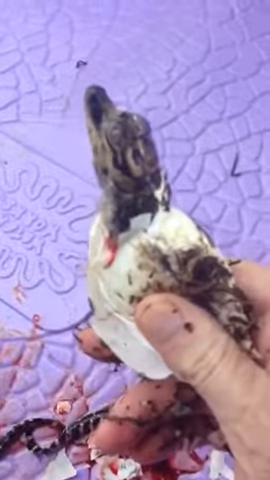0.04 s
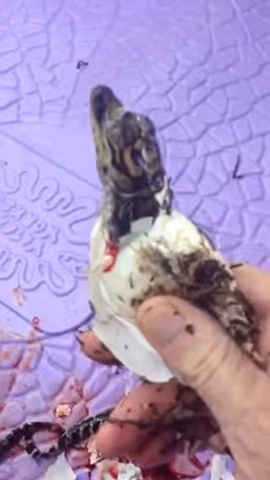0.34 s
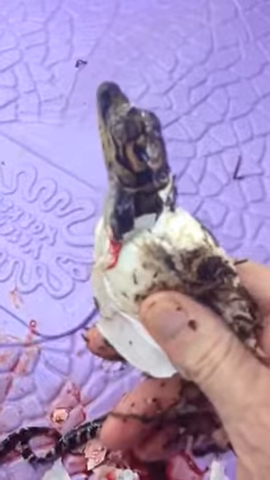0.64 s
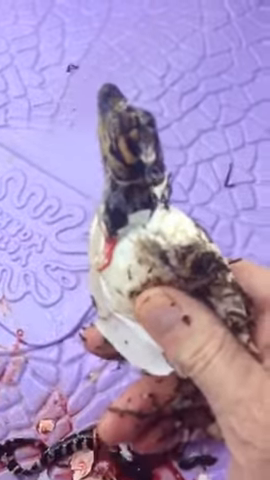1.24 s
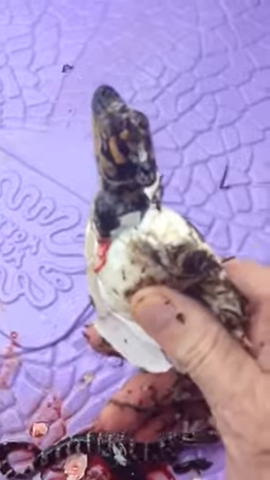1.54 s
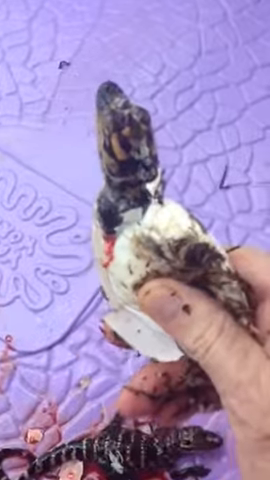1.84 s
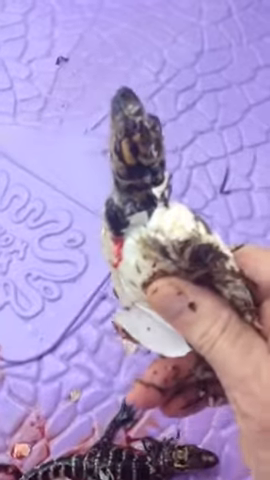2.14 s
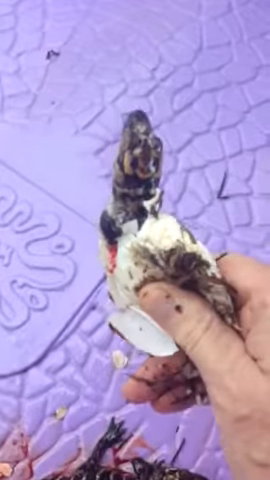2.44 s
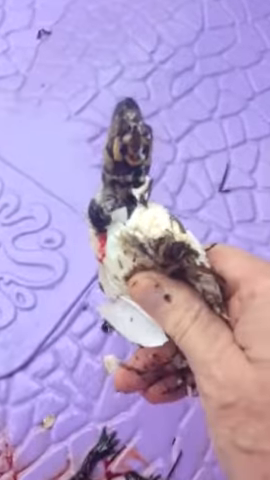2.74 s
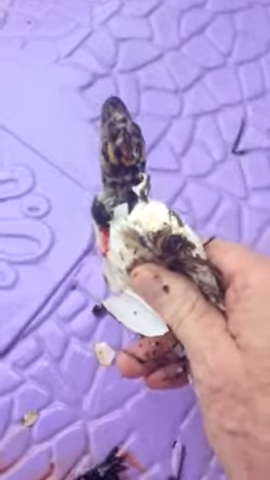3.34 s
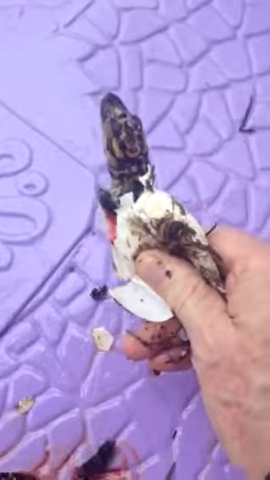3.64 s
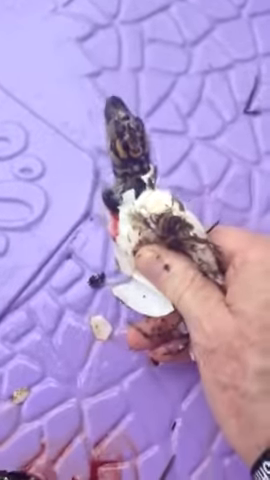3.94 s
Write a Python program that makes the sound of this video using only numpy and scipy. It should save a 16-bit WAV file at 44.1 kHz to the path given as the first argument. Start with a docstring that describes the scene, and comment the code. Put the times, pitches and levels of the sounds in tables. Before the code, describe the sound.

Two short, falling chirps from a hatching alligator, with faint shell snaps and a dull knock.

```python
"""In a small, dry space, over a plastic tub, a hatching alligator held in its egg gives two short chirps.
Its vocal folds slacken, so the pitch falls, and the throat and closed mouth filter the overtones.
Before the calls, one dull knock excites the damped modes of the tub. Wet shell snaps and rubs in the hand,
and soft handling bumps come through the tub, over a low rumble and a fine microphone hiss."""
import sys
import numpy as np
from scipy import signal
from scipy.fft import rfft, irfft
from scipy.io import wavfile
from scipy.ndimage import uniform_filter1d

SR = 44100
rng = np.random.default_rng(int(sys.argv[2]) if len(sys.argv) > 2 else 0)


def log_audio(samples):
    """Write samples as a 16-bit WAV file to the path given in sys.argv[1]."""
    # one column per channel
    frames = np.atleast_2d(samples).T
    # limit to full scale, then quantise
    limited = np.clip(frames, -1, 1)
    pcm = np.round(limited * 32767).astype(np.int16)
    wavfile.write(sys.argv[1], SR, pcm)


N = 176400

# Reverberation of the space. Each row: frequency in Hz, time to decay by 60 dB in seconds.
REVERB_TIMES = [(100, 0.41), (300, 0.23), (1200, 0.12), (4000, 0.074), (12000, 0.062)]
# Spectrum of the microphone hiss. Each row: frequency in Hz, relative density in dB.
HISS_SPECTRUM = [(100, 8), (400, -1.5), (800, -5.5), (1500, -9.5), (3000, -9.5), (4500, -8.5),
                 (6500, -12.5), (8500, -9), (10500, -4.5), (12500, -0.5), (15000, -6.5), (17000, 1)]
# Envelope of the hiss. Each row: time in seconds, level in dB.
HISS_ENVELOPE = [(0, -56), (.8, -56), (1.4, -55), (2, -56.5), (2.5, -56), (2.95, -56), (3.5, -55),
                 (3.85, -52.5), (4, -53)]
# Spectrum of the handling rumble. Each row: frequency in Hz, relative density in dB.
RUMBLE_SPECTRUM = [(15, -49.5), (35, -17.5), (60, 7.5), (100, 5), (150, -2), (220, -16), (330, -26.5),
                   (600, -40.5), (1500, -42)]
# Envelope of the rumble. Each row: time in seconds, level in dB.
RUMBLE_ENVELOPE = [(0, -48.5), (.2, -52.5), (.45, -54), (.6, -49.5), (.7, -59.5), (.87, -51), (1.0, -62),
                   (1.23, -65), (1.3, -50.5), (1.47, -48), (1.57, -64), (1.7, -58), (1.8, -61.5),
                   (2.35, -63.5), (2.58, -55), (2.76, -53.5), (2.82, -92), (3.02, -56), (3.15, -57),
                   (3.35, -46.5), (3.5, -56.5), (3.7, -47.5), (3.92, -65.5), (4, -57)]
# Soft handling bumps. Each row: time in seconds, level in dB, pitch in Hz.
HANDLING_BUMPS = [(.033, -39, 147), (.042, -33.5, 139), (.190, -35, 120), (.211, -25.5, 135),
                  (.225, -34, 254), (.2325, -35, 387), (.243, -30.5, 132), (.253, -36, 153),
                  (.391, -38.5, 159), (.516, -39.5, 114), (.5215, -34, 354), (.524, -28, 155),
                  (.529, -29.5, 71), (.543, -36, 222), (.622, -39.5, 95), (1.308, -46, 89.5),
                  (1.392, -39, 186), (1.414, -35.5, 175), (1.421, -39, 70), (1.47, -42, 91),
                  (1.696, -36.5, 132), (2.09, -41.5, 130), (2.43, -40, 85.5), (2.469, -35, 129),
                  (2.484, -37, 224), (2.575, -43, 102), (2.674, -41.5, 112), (2.75, -41, 82),
                  (2.768, -44, 79), (3.38, -36, 104), (3.607, -40.5, 109), (3.716, -46, 121),
                  (3.757, -38, 86)]
# Snaps of wet shell. Each row: time in seconds, level in dB, pitch in Hz.
SHELL_SNAPS = [(0.3933, -46, 2280), (0.5776, -35, 4540), (0.5968, -36, 3050), (0.971, -48, 2470),
               (.9937, -39, 4700), (1.009, -31.5, 4440), (1.016, -57, 4500), (1.0532, -36, 4500),
               (1.059, -40, 3500), (1.134, -44, 3660), (1.189, -38, 5250), (1.3215, -43, 7300),
               (1.4294, -42, 4400), (1.4826, -30.5, 2960), (1.491, -45, 3350), (1.5942, -38.5, 3100),
               (1.6314, -39.5, 3450), (1.774, -48, 3160), (1.797, -47, 2680), (1.896, -43, 8300),
               (1.9275, -39, 8300), (2.6828, -38.5, 2920), (3.149, -42.5, 2960), (3.382, -48, 4700),
               (3.5412, -30.5, 3700), (3.746, -30.5, 4230), (3.852, -40, 3060), (3.946, -35.5, 4000)]
# Skin rubbing on shell. Each row: start and length in seconds, level in dB, pitch in Hz,
# half-width in octaves.
SHELL_RUBS = [(.98, .1, -64, 5000, .6), (1.436, .07, -55, 3500, .3), (1.765, .045, -64, 2900, .25),
              (2.75, .04, -59, 1950, .4), (3.144, .018, -60, 1200, 1.3), (3.79, .08, -63, 2500, 1.0),
              (3.93, .11, -58, 2000, 1.2)]
# Modes of the tub. Each row: frequency in Hz, relative level in dB, time to decay by 60 dB in seconds.
TUB_MODES = [(135, -9, .14), (172, -10, .08), (231, -14, .06), (361, -12, .05), (475, -1, .052),
             (570, -5, .04), (675, -12, .045), (829, -17, .04), (1044, -11, .04), (1300, -7, .03),
             (1700, -14, .025)]
# The knock and its rebounds. Each row: start in seconds, impulse in dB, contact time in seconds.
TUB_BLOWS = [(3.0438, -22, 0.00094), (3.0577, -15.5, 0.0037), (3.0635, -20, 0.0028), (3.0813, -33, 0.0045)]
# Reflections of the voice off the tub. Each row: delay in seconds, gain as a factor.
TUB_ECHOES = [(.0037, -0.067), (.0062, -0.073), (0.012, 0.024)]
# Source spectrum of the vocal folds. Each row: harmonic number, relative level in dB.
FOLD_HARMONICS = [(1, -2.5), (2, -1), (3, -6), (4, -6), (5, -4), (8, -8.5), (16, -10.5), (40, -40)]
# Response of the throat and closed mouth. Each row: frequency in Hz, gain in dB.
VOCAL_TRACT = [(150, -21.5), (320, -12.5), (500, -9), (750, -5.5), (950, -4.5), (1160, 0.5), (1480, -2.5),
               (1850, -15), (2400, -11.5), (3300, -20.5), (3900, -30.5), (5000, -31), (6000, -37),
               (8700, -27.5), (14000, -54)]
# The calls. Each row: start, time held at the top and length in seconds, top pitch in Hz,
# pitch from which the steady slide starts in Hz.
CHIRPS = [(3.187, .0063, .085, 1500, 1100), (3.6903, .0003, .094, 1540, 1285)]

BAND_EDGE_HZ = 15450


def amp(db):
    """Amplitude grows tenfold with every 20 dB."""
    return 10 ** (np.asarray(db) / 20)


def unit(x):
    """Normalisation brings a signal to an rms of 1."""
    return x / np.sqrt(np.mean(x ** 2) + 1e-20)


def curve_at(points, hz):
    """Interpolation reads a curve along a logarithmic frequency axis."""
    frequencies, values = np.transpose(points)
    return np.interp(np.log(hz + 1e-9), np.log(frequencies), values)


def add(mix, start_s, sound):
    """Superposition: a sound adds to the mix from its start onward."""
    part = mix[max(round(start_s * SR), 0):][:len(sound)]
    part += sound[:len(part)]


def shaped_noise(spectrum, envelope):
    """Spectral shaping colours white noise, and an envelope sets its level over time."""
    gain = amp(curve_at(spectrum, np.fft.rfftfreq(N, 1 / SR)))
    coloured = irfft(rfft(rng.standard_normal(N)) * gain, N)
    level_db = np.interp(np.arange(N) / SR, *np.transpose(envelope))
    return unit(coloured) * amp(level_db)


def resonate(x, response, size=4096):
    """A minimum-phase filter is causal: its resonances ring after each pulse."""
    log_gain = np.log(amp(curve_at(response, abs(np.fft.fftfreq(size, 1 / SR)))))
    ring = np.fft.ifft(np.exp(np.conj(signal.hilbert(log_gain)))).real
    return signal.fftconvolve(x, ring[:size // 2])[:len(x)]


def shell_band(x, hz, half_width_oct):
    """A broad resonance of the shell acts as a band-pass filter; the result has an rms of 1."""
    octaves = np.log2((np.fft.rfftfreq(len(x), 1 / SR) + 1) / hz)
    return unit(irfft(rfft(x) / (1 + (octaves / half_width_oct) ** 2), len(x)))


def damped_pulses(rows, width_cycles):
    """Heavy damping leaves only a swing or two of each push: a sine under a Gaussian envelope."""
    out = np.zeros(N)
    t = np.arange(-SR // 40, SR // 40) / SR
    for centre, db, hz in rows:
        envelope = amp(db) * np.exp(-(t * hz / width_cycles) ** 2 / 2)
        add(out, centre + t[0], envelope * np.sin(-2 * np.pi * hz * t))
    return out


def room(x, wet_db):
    """Diffuse reverberation adds a short tail that decays exponentially, slowest in the bass."""
    hz, t, spectra = signal.stft(rng.standard_normal(SR // 2), SR, nperseg=256)
    t60 = curve_at(REVERB_TIMES, hz)[:, None]
    tail = signal.istft(spectra * amp(-60 * t / t60) / np.sqrt(t60), SR, nperseg=256)[1]
    tail *= np.minimum(np.arange(len(tail)) / SR / .005, 1)  # builds up over 5 ms
    return x + amp(wet_db) * signal.fftconvolve(x, tail / np.linalg.norm(tail))[:N]


def hiss():
    """The self-noise of the microphone forms a nearly steady broadband floor."""
    return shaped_noise(HISS_SPECTRUM, HISS_ENVELOPE)


def handling():
    """Structure-borne sound: the moving hand makes soft bumps and a low rumble."""
    bumps = damped_pulses(HANDLING_BUMPS, width_cycles=.34)
    return room(bumps, wet_db=-12) + shaped_noise(RUMBLE_SPECTRUM, RUMBLE_ENVELOPE)


def membrane(ticks_per_s=25):
    """The wet membrane ticks faintly as the egg shifts: independent impulses, a Poisson process."""
    ticks = rng.standard_normal(N) * (rng.random(N) < ticks_per_s / SR)
    return amp(-76) * shell_band(ticks, hz=5970, half_width_oct=1)


def shell(fizz_db=-17, fizz_decay_s=.0022, grains_per_s=5000, grain_spread_db=2.0):
    """Each snap is a damped transient with a brief wet fizz; friction of skin makes grainy rubs."""
    out = damped_pulses(SHELL_SNAPS, width_cycles=.5)
    t = np.arange(SR // 40) / SR
    for start, db, hz in SHELL_SNAPS:
        fizz = shell_band(rng.standard_normal(len(t)), hz, half_width_oct=1)
        add(out, start, amp(db + fizz_db) * np.exp(-t / fizz_decay_s) * fizz)
    for start, length, db, hz, half_width in SHELL_RUBS:
        n = int(length * SR)
        grains = rng.standard_normal(N) * (rng.random(N) < grains_per_s / SR)
        grains *= amp(grain_spread_db * rng.exponential(1, N))
        add(out, start, amp(db) * np.sqrt(np.hanning(n)) * shell_band(grains[:n], hz, half_width))
    return room(out, wet_db=-7.5)


def knock(cutoff_hz=1480):
    """Blunt blows excite the modes of the tub; the longer the contact, the duller the sound."""
    force = np.zeros(N)
    t = np.arange(SR // 3) / SR
    for start, db, contact in TUB_BLOWS:
        push = np.sin(np.pi * np.minimum(t / contact, 1)) ** 2
        add(force, start, amp(db) * push / push.sum())
    ring = sum(amp(db - 60 * t / t60) * np.cos(2 * np.pi * hz * t) for hz, db, t60 in TUB_MODES)
    vibration = signal.fftconvolve(force, ring)[:N]
    lowpass = signal.butter(2, cutoff_hz, fs=SR)
    return room(signal.lfilter(*lowpass, vibration), wet_db=-8.5)


def vocal_folds(held, length, top_hz, slide_hz, drop_s=.007, slide_oct_per_s=33.2, attack_s=.007):
    """Pitch follows tension: the folds start as a whistle and slacken into separate, uneven pulses."""
    t = np.arange(0, length, 1 / SR)
    fall_s = np.maximum(t - held, 0)
    jitter, shimmer = unit(uniform_filter1d(rng.standard_normal((2, len(t))), SR // 400))
    # The pitch drops quickly off its top, then slides down evenly.
    pitch = slide_hz + (top_hz - slide_hz) * np.exp(-fall_s / drop_s)
    pitch *= 2 ** (-slide_oct_per_s * fall_s) * (1 + .01 * jitter)
    phase = 2 * np.pi * np.cumsum(pitch) / SR
    # Taut folds swing more like a sine, so high pitch weakens the harmonics above the second.
    tilt_db = -.5 * (pitch / top_hz) ** 2
    tone = np.zeros(len(t))
    for k in range(1, 41):
        gain = amp(curve_at(FOLD_HARMONICS, k) + tilt_db * max(k - 2, 0))
        tone += gain * np.cos(k * phase) * (k * pitch < BAND_EDGE_HZ)
    rasp = amp(-17) * (1 + np.cos(phase)) * rng.standard_normal(len(t))
    # The effort swells, holds, then fades and grows unsteady.
    fade_db = -24 * (t / length) ** 2.58
    shimmer_db = 2 * shimmer * t / length
    effort = np.minimum(t / attack_s, 1) * amp(-24.5 + fade_db + shimmer_db)
    return (tone + rasp) * effort


def alligator():
    """Source and filter: the folds drive the throat and mouth, and the tub reflects both chirps."""
    source = np.zeros(N)
    for start, *shape in CHIRPS:
        add(source, start, vocal_folds(*shape))
    voice = resonate(source, VOCAL_TRACT)
    out = voice.copy()
    for delay, gain in TUB_ECHOES:
        add(out, delay, gain * voice)
    return room(out, wet_db=-10.5)


def scene():
    """The sources add linearly at one close microphone."""
    return (alligator() + knock() + handling() + shell() + membrane() + hiss())[None]


def record(dry):
    """A steep linear-phase low-pass filter limits the bandwidth."""
    lowpass = signal.firwin(511, BAND_EDGE_HZ, window=("kaiser", 9), fs=SR)
    return signal.oaconvolve(dry, lowpass[None], "same")


dry = scene()
out = record(dry)
log_audio(out)
```